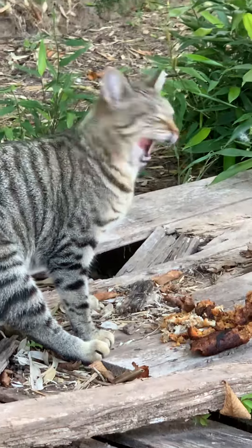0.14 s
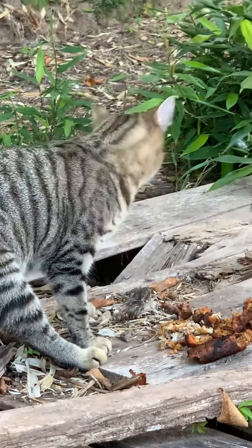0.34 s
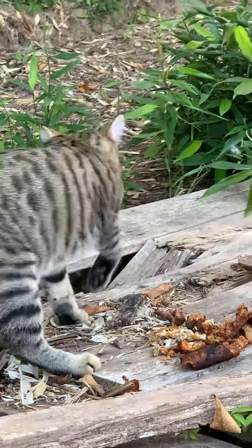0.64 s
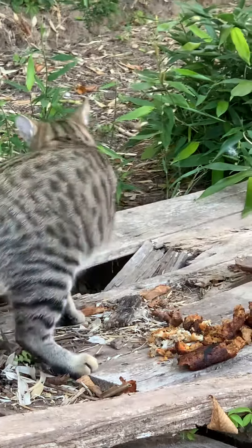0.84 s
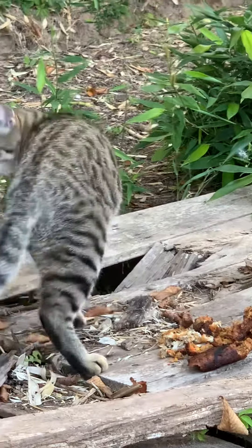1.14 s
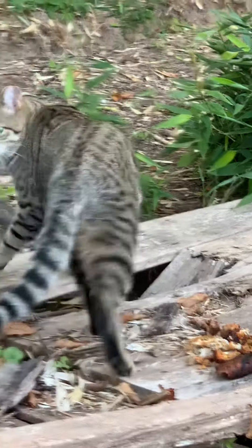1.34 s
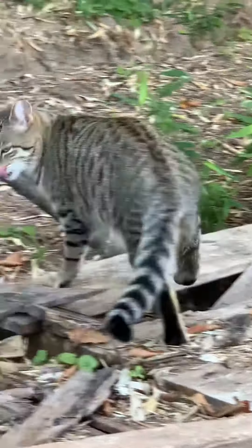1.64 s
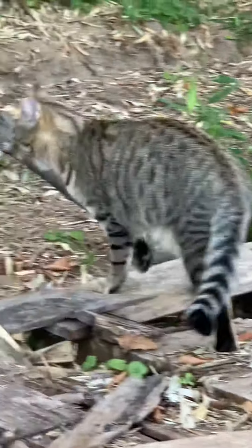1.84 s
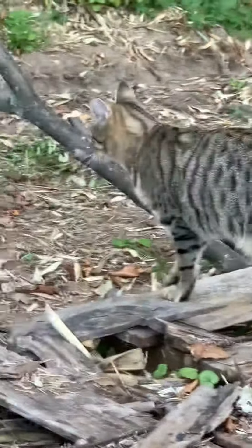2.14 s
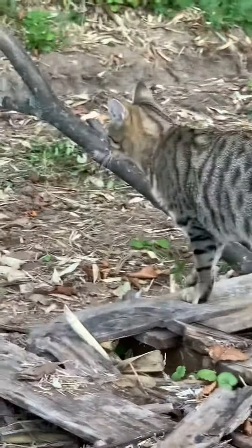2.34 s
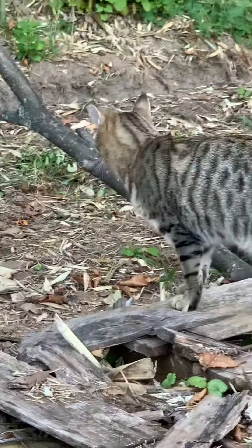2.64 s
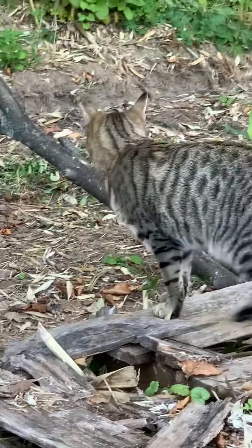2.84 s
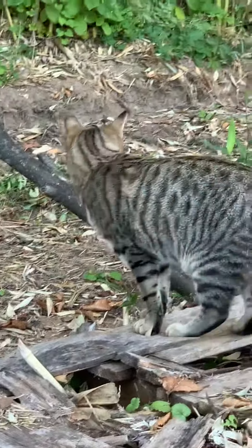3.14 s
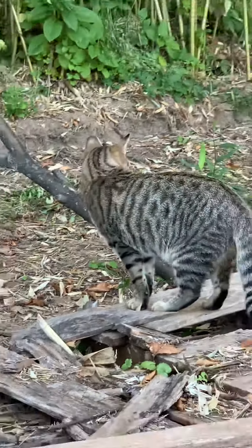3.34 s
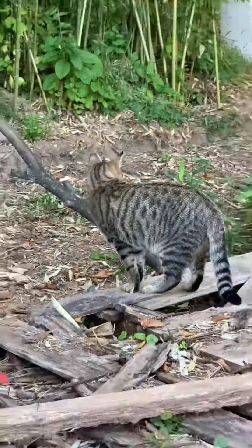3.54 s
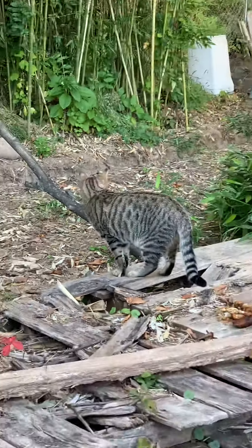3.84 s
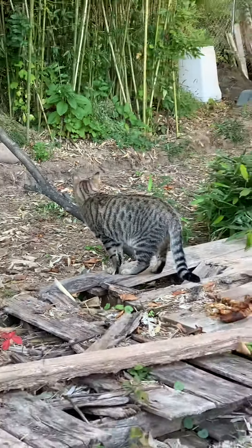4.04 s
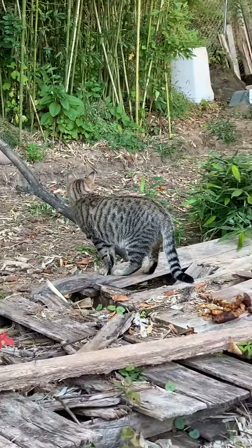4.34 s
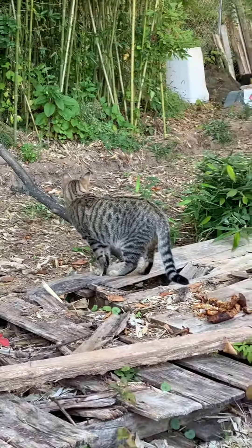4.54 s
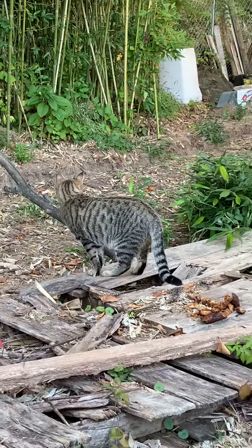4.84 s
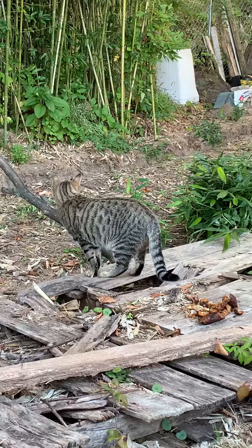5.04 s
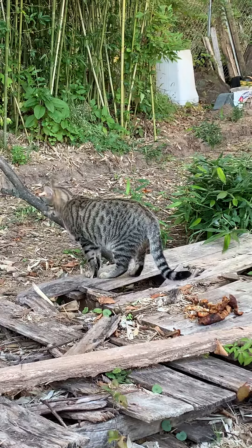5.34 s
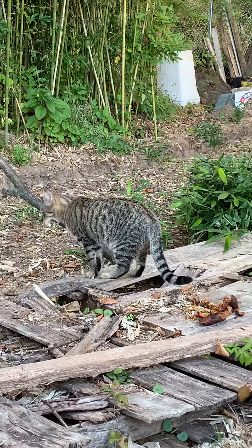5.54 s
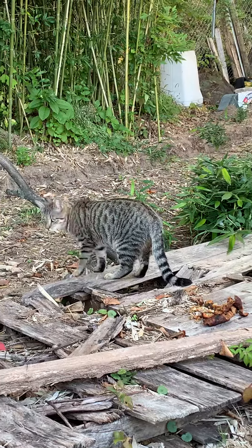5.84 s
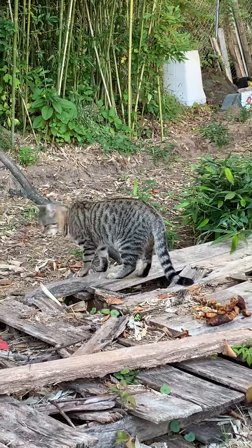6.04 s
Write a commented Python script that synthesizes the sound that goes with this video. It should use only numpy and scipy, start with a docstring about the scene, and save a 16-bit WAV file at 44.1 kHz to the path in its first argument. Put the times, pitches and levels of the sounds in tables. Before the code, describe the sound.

A motorbike roars past at close range while a cat hisses briefly, then a slower engine hums nearer over distant traffic, insects and rustling leaves.

```python
"""A garden beside a road. A motorbike speeds past behind the bamboo: steady exhaust tones that waver as echoes
cross them, over a puffing roar and knocks that ring at two moving pitches. A cat hisses, as shaped noise, at
the height of the pass. A second, slower engine, built from pure tones, draws near over the rumbling noise of
distant traffic. Insects sing near 4 kHz as narrow noise and pulsing whistles, and dry leaves tick, rustle and
scrape under paws as short bursts of noise. Two microphone ports hear it."""
import sys
import numpy as np
from scipy import signal
from scipy.fft import rfft, irfft, next_fast_len
from scipy.io import wavfile
from scipy.ndimage import uniform_filter1d

SR = 44100
rng = np.random.default_rng(int(sys.argv[2]) if len(sys.argv) > 2 else 0)


def dump_mix(stems):
    """Bounce the given channels to the path in sys.argv[1] as a 16-bit WAV at rate SR."""
    frames = np.atleast_2d(stems).T  # one column per channel
    limited = np.clip(frames, -1, 1)  # hard clip at full scale
    pcm = np.round(limited * 32767).astype(np.int16)
    wavfile.write(sys.argv[1], SR, pcm)


N = 273574
T = np.arange(N) / SR  # time of each sample, s
SIZE = next_fast_len(N)
F = np.arange(SIZE // 2 + 1) * SR / SIZE + 1e-3  # frequencies of a spectrum, Hz; never zero, for the logarithms

# The motorbike passing; an order is a multiple of the engine's cycle rate
# (time [s], cycle rate [Hz], roar level [dB], 4th order level before its echo [dB], 4th order echo share [0-1],
#  6th order level before its echo [dB], other orders against the roar [dB])
BIKE_PASS = [(0, 44.8, -45.5, -36.5, .95, -43, -11), (.3, 47.3, -44.5, -35.5, .9, -47, -2.5),
             (.6, 48.7, -41, -44.5, .8, -42.5, 0), (1, 50.75, -40.5, -45.5, .6, -48.5, 3),
             (1.3, 52.01, -39.5, -38, .3, -43, 1), (1.47, 52.83, -36.5, -45, .95, -51, 5.5),
             (1.62, 52.8, -40.5, -46, .95, -54, -2), (1.8, 52.25, -45, -50.5, .9, -54, -3.5),
             (2.05, 50.9, -54.5, -59.5, .7, -60.5, 0.5), (2.35, 48.73, -64, -54, .5, -68.5, 6.5),
             (3, 45.34, -60.5, -68, .5, -52.5, -3.5)]
# An echo crosses the exhaust note (2nd order). Its path grows half a wavelength from row to row,
# so it opposes the note on the first row, helps it on the next, and so on
# (time [s], note level before the echo [dB], echo share [0-1])
EXHAUST_ECHO = [(-.02, -22, 0.1), (.14, -29, 0.5), (.235, -30, 0.7), (.31, -32.5, 0.5), (.39, -32.5, 0.6),
                (.56, -30, 0.5), (.74, -30.5, 0.4), (.88, -26, .5), (.965, -32, 0.42), (1.1, -27, 0.5),
                (1.215, -29.5, 0.3), (1.38, -24.5, .4), (1.445, -20.5, 0.5), (1.55, -20.5, 0.53),
                (1.64, -30, 1), (1.73, -28, 0.8), (1.91, -30.5, .8), (2.12, -27, 0.4), (2.22, -26, 0.8),
                (2.33, -33, 0.6), (2.415, -34, 1), (2.48, -39.5, .7), (2.58, -36, 1), (2.64, -38, 0.63),
                (2.75, -38, .7), (2.78, -38, .6), (2.9, -43, .5)]
# The other exhaust orders (order [cycles of the tone per engine cycle], base level against the roar [dB])
OTHER_ORDERS = [(1, -23.5), (3, -16), (5, -9.5), (7, -17), (8, -8), (9, -15), (10, -9), (11, -15.5),
                (12, -19), (13, -25), (14, -25)]
# Tone colour of the exhaust roar (frequency [Hz], relative level per Hz [dB])
ROAR_SPECTRUM = [(120, -22), (250, -10.5), (450, -8.5), (700, -10.5), (900, -19), (1200, -17), (1900, -17),
                 (2600, -26.5), (3700, -27), (4900, -34.5), (6200, -33.5), (7500, -43), (8700, -46.5),
                 (11000, -66.5)]
# Two moving resonances that colour the exhaust knocks
# (time [s], lower resonance [Hz], upper resonance [Hz], base level against the roar [dB])
KNOCK_RESONANCES = [(0, 1245, 1602, -14), (.35, 1196, 1600, -9.5), (.7, 1150, 1846, -10.5),
                    (1.05, 1149, 1802, -11.5), (1.3, 1247, 1751, -5), (1.5, 1344, 1784, -8),
                    (1.75, 1317, 1777, -13), (2.2, 1255, 1735, -8)]
# Strength of four firings in turn, before a random change to each (level [dB])
KNOCK_STRENGTH = [5.5, 0, -0.5, 3]
# Pushes of the cat's hiss (full at [s], hold [s], level [dB])
HISS_PUSHES = [(1.17, 0.092, -53.5), (1.4, .03, -53.5), (1.54, 0.014, -48.5)]
# Resonances of the cat's open mouth (frequency [Hz], width [Hz], relative level [dB])
MOUTH_PEAKS = [(3560, 750, 7.5), (5600, 3700, -7.5), (7873, 3500, -9.5), (2000, 750, -9)]
# The slower engine; its echo path also grows half a wavelength of the firing rate from row to row
# (time [s], firing rate [Hz], echo share before easing for higher multiples [0-1],
#  base level of the 1st, 2nd, 3rd and 4th multiple, one column each [dB])
SLOW_ENGINE = [(2.3, 70.18, 0.46, -55, -57, -56, -66), (2.65, 70.36, 0.63, -58, -62, -60, -55.5),
               (2.97, 69.97, 0.37, -41.5, -51, -65, -58.5), (3.08, 70.13, .1, -44, -46, -61, -60.5),
               (3.21, 70.5, .1, -33, -37, -56, -55.5), (3.38, 70.6, 0.24, -34.5, -42, -48, -56.5),
               (3.67, 71.44, 0.32, -32, -45, -57.5, -58), (4.22, 72.34, 0.52, -32, -48.5, -56, -61.5),
               (4.68, 72.5, 0.34, -34.5, -45, -55, -60), (4.86, 73.3, 0.22, -36, -36, -60, -60.5),
               (4.96, 73.66, 0.084, -27.5, -44.5, -50.5, -63), (5.2, 74.14, 0.22, -29, -48, -53, -57.5),
               (5.91, 76.88, 0.29, -37, -39.5, -55.5, -58), (6.12, 77.37, 0.099, -34, -35.5, -47.5, -54.5),
               (6.5, 79.1, .1, -34, -50, -45, -48)]
# Bursts of rustling leaves (full at [s], hold [s], base level [dB])
RUSTLE_BURSTS = [(5.31, 0.45, -64.5), (6.04, .08, -62)]
# Soft crackles of leaves (time [s], base level [dB], time to fade by 60 dB [s])
LEAF_TICKS = [(3.535, -65, 0.16), (3.62, -64, 0.21)]
# Tone colour of the leaves (frequency [Hz], width [Hz], relative level [dB])
LEAF_PEAKS = [(5400, 1500, -2.5), (6460, 870, -6.5), (2130, 1600, 7.5)]
# A leaf dragged over wood (full at [s], hold [s], level [dB], pitch [Hz])
LEAF_SCRAPES = [(5.284, .17, -73, 5150), (5.502, 0.14, -70, 5500), (5.36, .1, -75, 5950),
                (5.768, .03, -79, 6400), (6, .1, -62.5, 1903), (6.045, 0.052, -71, 6240)]
# The broad insect chorus (frequency [Hz], width [Hz], base level [dB])
INSECT_CHORUS = [(4230, 850, -73.5)]
# Single insects (start [s], end [s], pitch [Hz], scale of the random phase [rad], base peak level [dB],
#  pulse rate [pulses per s], pulse depth up and down [dB])
INSECT_TRILLS = [(2.1, 2.751, 4150, 6.5, -73.5, 49, 3.5), (2.58, 2.84, 4480, 2.0, -73, 45.4, 7),
                 (2.26, 2.7, 3940, 1.5, -74, 45, 3.5)]
# Songs of one cricket (start [s], end [s], base peak level [dB], depth of the chirp groups up and down [dB])
CRICKET_SONGS = [(2.46, 3.01, -73, 5), (5.38, 5.92, -67, 1)]
# Tone colour of the far road (frequency [Hz], relative level per Hz [dB])
TRAFFIC_SPECTRUM = [(15, -44), (25, -20), (70, -4), (91, -8), (135, -10.5), (186, -18), (289, -23),
                    (378, -30.5), (471, -29), (631, -27.5), (1350, -31), (2810, -45.5), (4150, -47),
                    (5300, -58.5), (8650, -67), (11200, -95), (19000, -120)]
# Slow swell of the far road (time [s], base level [dB], brightness [dB per octave])
TRAFFIC_SWELL = [(0, -41.5, -0.5), (1.5, -35.5, 0), (2.5, -43.5, -1), (3.2, -42.5, -1), (4, -41.5, 0),
                 (4.7, -41, 0), (5.3, -40, -0.63), (5.8, -40, 0.75), (6.2, -37.5, 0.5)]
# How alike scattered noise is at the two ports (frequency [Hz], share common to both [0-1])
COMMON_SHARE = [(60, 1), (120, 0.98), (250, 0.74), (500, 0.45), (1000, 0.41), (2000, 0.46), (4000, 0.22),
                (8000, 0.38)]
# How the ports differ (frequency [Hz], lead of the left port [rad], left minus right level [dB])
PORT_DIFFERENCES = [(97, 0.12, -0.5), (497, 0.04, -0.5), (1290, 0.67, -2), (1830, 0.42, -1.5),
                    (3050, 1.94, -.5), (4100, 1.5, 0), (6050, 5, 1), (6430, 0.44, 1), (6750, 6.5, 0),
                    (8240, 7.7, 1)]

FOURTH_BEAT_HZ, FOURTH_NULL_S = 5.5, 0.165  # the echo beats steadily on the 4th order, from a dip at this time
UPPER_SHARE = 0.5  # echo share on the other orders, which beat in proportion to their pitch
BRIGHT_AT_DB, BRIGHT_PER_DB = -41, 0.1691  # brightness of the roar: dB per octave for each dB above this level
DULL_FROM_S, DULL_FOR_S = 1.58, 0.25  # the pipe turns away and the roar grows duller
DULL_DB_S = 2.5  # brightness lost meanwhile, dB per octave each second
HISS_RISE_DB_S, HISS_FALL_DB_S = 298, 201
RUSTLE_RISE_DB_S, RUSTLE_FALL_DB_S = 200, 90
CRICKET_HZ, CRICKET_PULSES_S = 3705, 31  # pitch, and pulses per second
CRICKET_GROUPS_S, CRICKET_GROUP_AT_S = 6.5, 2.545  # groups per second, and the middle of one group
HIGH_TICK_S, HIGH_TICK_DB, HIGH_TICK_HZ, HIGH_TICK_T60_S = 1.011, -60, 13300, .03
CAPSULE_LOW_HZ, CAPSULE_TOP_HZ, OUTPUT_TOP_HZ = 40, 8840, 14600
COMMON_HISS_DB = -84  # the part of the preamplifier's hiss that both sides share


def motorbike():
    """The passing bike: exhaust tones, with the roar of gas and a ringing rasp."""
    turns = np.cumsum(curves(BIKE_PASS)[0]) / SR  # engine cycles so far
    roar = exhaust_roar(turns) + exhaust_rasp(turns)
    return exhaust_note(turns) * span(-1, 2.885, 0.29) + roar * span(-1, 2.99, .4)


def exhaust_note(turns):
    """Tones at multiples of the engine cycle; echoes strengthen or cancel each one in turn."""
    _, roar_db, fourth_db, fourth_share, sixth_db, others_db = curves(BIKE_PASS)
    note_db, share = curves(EXHAUST_ECHO)
    note = tone(turns, order=2, db=note_db + echo_db(row_path(EXHAUST_ECHO), share), wander=.1)

    fourth_path = FOURTH_BEAT_HZ * (T - FOURTH_NULL_S) + .5
    note += tone(turns, order=4, db=fourth_db + echo_db(fourth_path, fourth_share), wander=0.079)

    sixth_path = FOURTH_BEAT_HZ * 6 / 4 * T + .1 * walk(3)
    note += tone(turns, order=6, db=sixth_db + echo_db(sixth_path, .85) + 1.5 * walk(6), wander=.2)

    for order, base_db in OTHER_ORDERS:
        # each order beats from a random starting phase
        path = FOURTH_BEAT_HZ * order / 4 * T + rng.random()
        level_db = roar_db + others_db + base_db + echo_db(path, UPPER_SHARE) + 2 * walk(6.1)
        note += tone(turns, order, level_db, wander=.25)
    return note


def exhaust_roar(turns):
    """Rushing gas: steady noise plus a puff that fades on every engine cycle."""
    roar_db = curves(BIKE_PASS)[1]
    puffs = 1.6 + np.exp(-(turns % 1) / 0.042)
    dulling = DULL_DB_S * np.clip(T - DULL_FROM_S, 0, DULL_FOR_S)
    tilt_db = BRIGHT_PER_DB * (roar_db - BRIGHT_AT_DB) - dulling
    return undb(roar_db) * bands(air(puffs, direct=0.28), ROAR_SPECTRUM, tilt_db, flicker_db=1.55)


def exhaust_rasp(turns):
    """Each firing, two per cycle, is a knock of noise with its own strength, coloured by two moving resonances."""
    roar_db = curves(BIKE_PASS)[1]
    low_hz, high_hz, rasp_db = curves(KNOCK_RESONANCES)
    firings = 2 * turns
    strength_db = np.resize(KNOCK_STRENGTH, 800) + 6.3 * (rng.random(800) - .5)
    knocks = np.exp(-(firings % 1) / 0.3) * undb(strength_db)[firings.astype(int)]
    low_ring = undb(1.8 * walk(18)) * ring(knocks, low_hz, width_hz=230)
    high_ring = undb(-2.0 + 3.1 * walk(18)) * ring(knocks, high_hz, width_hz=320)
    return undb(roar_db + rasp_db) * (low_ring + high_ring)


def cat():
    """Air forced over the tongue in three pushes, coloured by the open mouth."""
    level = bursts(HISS_PUSHES, HISS_RISE_DB_S, HISS_FALL_DB_S) * undb(1.1 * walk(35))
    return level * shaped(air(direct=0.39), peaks(MOUTH_PEAKS))


def motor():
    """The slower engine: four multiples of its firing rate crossed by one echo, and uneven-cylinder half orders."""
    hz, share, *levels_db = curves(SLOW_ENGINE)
    path = row_path(SLOW_ENGINE)
    turns = np.cumsum(hz) / SR  # firings so far
    note = 0
    for multiple, base_db in enumerate(levels_db, start=1):
        echo = echo_db(multiple * path, share / multiple ** 0.24)
        note = note + tone(turns, multiple, base_db + echo + 0.5 * walk(12), wander=0.082)
    # fainter tones halfway between the multiples
    note += tone(turns, order=3 / 2, db=-51.0 + 3.5 * walk(7), wander=0.38)
    note += tone(turns, order=5 / 2, db=-63 + 7.0 * walk(5.3), wander=0.46)
    return note * span(2.35, 7, 0.18)


def leaves():
    """Dry leaves: many small uneven grains make a rustle and short, soft crackles, joined by scrapes."""
    level = bursts(RUSTLE_BURSTS, RUSTLE_RISE_DB_S, RUSTLE_FALL_DB_S) * undb(0.4 * walk(22))
    # a faint, continuous, uneven crackle of treble noise
    level = level + undb(-86.0 + 3.5 * walk(13))
    for at, db, t60 in LEAF_TICKS:
        fade = np.exp(-np.log(1000) * np.abs(T - at) / t60)
        level = level + undb(db) * span(at - .004, 7, 0.0074) * fade
    grains = undb(2.7 * walk(90))
    return level * grains * shaped(air(), peaks(LEAF_PEAKS)) + leaf_scrapes()


def leaf_scrapes():
    """A leaf dragged over wood: uneven rubbing noise that rings at one pitch for each scrape."""
    out = 0
    for *burst, hz in LEAF_SCRAPES:
        rubbing = ring(undb(1.8 * walk(40)), np.full(N, hz), width_hz=600)
        out = out + bursts([burst], rise_db_s=150, fall_db_s=150) * rubbing
    return out


def insects():
    """A broad chorus of narrow-band noise, and single singers whose wavering whistles pulse."""
    out = 0
    for hz, width, db in INSECT_CHORUS:
        out = out + undb(db + 0.57 * walk(3.6)) * shaped(air(), peak(hz, width))
    for start, end, hz, jitter, db, rate, depth_db in INSECT_TRILLS:
        pulses_db = depth_db * np.cos(2 * np.pi * rate * T + .6 * walk(5)) + 2.2 * walk(25)
        whistle = np.sin(2 * np.pi * hz * T + jitter * walk(90))
        out = out + undb(db + pulses_db) * span(start, end, 0.1) * whistle
    return out


def cricket():
    """One cricket: a clean whistle in short pulses that come in groups."""
    groups = np.cos(2 * np.pi * CRICKET_GROUPS_S * (T - CRICKET_GROUP_AT_S))
    pulses_db = 6 * np.cos(2 * np.pi * CRICKET_PULSES_S * T + .6 * walk(5)) + 1.5 * walk(25)
    level = 0
    for start, end, db, depth_db in CRICKET_SONGS:
        level = level + undb(db + depth_db * groups) * span(start, end, .06)
    whistle = np.sin(2 * np.pi * CRICKET_HZ * T + 1.1 * walk(80))
    return level * undb(pulses_db) * whistle


def traffic():
    """The far road: a broad rumble of noise that swells slowly."""
    level_db, tilt_db = curves(TRAFFIC_SWELL)
    return undb(level_db) * bands(air(), TRAFFIC_SPECTRUM, tilt_db, flicker_db=1.2)


def tone(turns, order, db, wander):
    """One order of an engine cycle; its phase wanders as the path shifts."""
    phase = 2 * np.pi * (order * turns + rng.random()) + wander * walk(8.3)
    return np.sqrt(2) * undb(db) * np.sin(phase)  # the root makes the level an rms level


def echo_db(wavelengths, share):
    """Level change when an echo with a longer path joins the direct sound."""
    echo = np.clip(share, 0, 0.97) * np.exp(2j * np.pi * wavelengths)
    return 20 * np.log10(np.abs(1 + echo))


def row_path(table):
    """Extra echo path in wavelengths: half a wavelength at the first row, and half more at each next row."""
    return np.interp(T, np.array(table)[:, 0], np.arange(len(table))) / 2 + .5


def ring(gate, hz, width_hz):
    """Gated noise ringing in a steep resonance whose centre moves, rms 1."""
    pole = np.exp(-np.pi * width_hz / SR)
    noise = rng.standard_normal((2, N)) + 1j * rng.standard_normal((2, N))
    slow = signal.lfilter([1], [1, -2 * pole, pole ** 2], gate * noise)
    # one part is common to both sides, the other has opposite signs
    sides = slow[0] + .5 * slow[1] * np.array([[1], [-1]])
    carrier = np.exp(2j * np.pi * np.cumsum(hz) / SR)  # lifts the slow noise up to the pitch
    x = np.real(sides * carrier)
    return x / np.sqrt(np.mean(x ** 2))


def air(gate=1., direct=0.):
    """Spectra of noise at the two ports: one part in common, the rest scattered; direct sound scatters less."""
    both, left, right = rfft(gate * rng.standard_normal((3, N)), SIZE)
    scattered = np.clip(1 - along(COMMON_SHARE, F), 0, 1) * (1 - np.clip(direct, 0, 1))
    return np.sqrt(1 - scattered) * both + np.sqrt(scattered) * np.array([left, right])


def shaped(spectra, gain):
    """Noise through a gain over frequency, rms 1."""
    x = irfft(spectra * gain, SIZE)[:, :N]
    return x / np.sqrt(np.mean(x ** 2))


def bands(spectra, colour, tilt_db, flicker_db):
    """Coloured noise in bands two octaves apart; each flickers alone, and the tilt turns about 1 kHz."""
    coloured = spectra * undb(along(colour, F))
    place = np.clip(np.log2(F / 1000), -4, 4)  # octaves from 1 kHz
    parts = []
    for octave in range(-4, 5, 2):
        mask = np.cos(np.pi / 4 * np.clip(place - octave, -2, 2)) ** 2
        parts.append((octave, irfft(coloured * mask, SIZE)[:, :N]))
    scale = np.sqrt(np.mean(sum(x for _, x in parts) ** 2))
    return sum(x * undb(octave * tilt_db + flicker_db * walk(9)) for octave, x in parts) / scale


def peak(hz, width_hz):
    """Gain over frequency of a steep resonance."""
    return 1 / (1 + ((F - hz) / (width_hz / 2)) ** 2)


def peaks(table):
    """Summed gain of several resonances."""
    return sum(undb(db) * peak(hz, width) for hz, width, db in table)


def bursts(rows, rise_db_s, fall_db_s):
    """Gain of sounds that rise, hold and fall at steady dB per second."""
    gain = 0
    for full_at, hold, db in rows:
        rise_db = rise_db_s * np.clip(full_at - T, 0, 9)
        fall_db = fall_db_s * np.clip(T - full_at - hold, 0, 9)
        gain = gain + undb(db - rise_db - fall_db)
    return gain


def span(t0, t1, fade):
    """1 between two times, fading at both ends."""
    return np.clip(np.minimum(T - t0, t1 - T) / fade, 0, 1)


def walk(rate):
    """A slow random wander: levels held 1 / rate seconds and smoothed twice; spread near 1."""
    hold = int(SR / rate)
    steps = np.repeat(rng.standard_normal(N // hold + 1), hold)
    return 1.3 * uniform_filter1d(uniform_filter1d(steps, hold), hold)[:N]


def curves(table):
    """Columns of a table as signals over time."""
    s, *columns = np.transpose(table)
    return [np.interp(T, s, c) for c in columns]


def along(points, hz, axis=1):
    """A column of a frequency table read on a log-frequency axis."""
    points = np.array(points)
    return np.interp(np.log(hz), np.log(points[:, 0]), points[:, axis])


def undb(db):
    """dB to gain."""
    return 10 ** (np.asarray(db) / 20)


def scene():
    """All sources at the two ports."""
    return motorbike() + cat() + motor() + leaves() + insects() + cricket() + traffic()


def ports(dry):
    """The two ports hear the same sound with a different phase and level."""
    skew = undb(along(PORT_DIFFERENCES, F, axis=2) / 2) * np.exp(.5j * along(PORT_DIFFERENCES, F))
    return irfft(rfft(dry, SIZE) * np.array([skew, 1 / skew]), SIZE)[:, :N]


def capsule(pair):
    """The capsule passes about 40 Hz to 9 kHz."""
    pair = signal.sosfilt(signal.ellip(10, .2, 50, CAPSULE_TOP_HZ, fs=SR, output="sos"), pair)
    return signal.sosfilt(signal.butter(3, CAPSULE_LOW_HZ, "high", fs=SR, output="sos"), pair)


def preamplifier_hiss():
    """Steady white noise: a part common to both sides and a weaker part with opposite signs."""
    hiss = rng.standard_normal((2, N))
    return undb(COMMON_HISS_DB) * (hiss[0] + .45 * hiss[1] * np.array([[1], [-1]]))


def high_tick():
    """One faint, very high tick: a rough tone that dies away fast."""
    after = np.clip(T - HIGH_TICK_S, 0, 9)
    level = undb(HIGH_TICK_DB - 60 * after / HIGH_TICK_T60_S) * (after > 0)
    return level * np.sin(2 * np.pi * HIGH_TICK_HZ * after + 2 * walk(960))


def record(dry):
    """Ports and capsule, then hiss and a high tick, which reach higher, up to the final treble limit."""
    pair = capsule(ports(dry)) + preamplifier_hiss() + high_tick()
    return signal.sosfilt(signal.ellip(10, .2, 60, OUTPUT_TOP_HZ, fs=SR, output="sos"), pair)


dry = scene()
out = record(dry)
dump_mix(out)
```